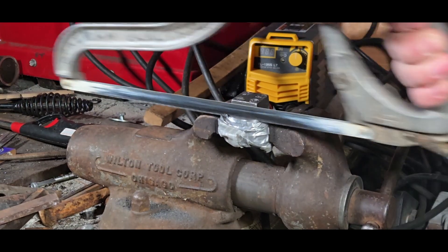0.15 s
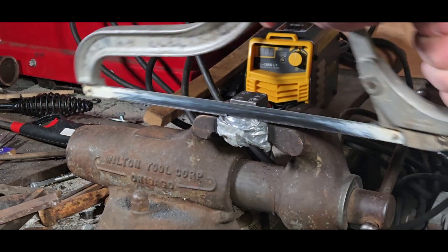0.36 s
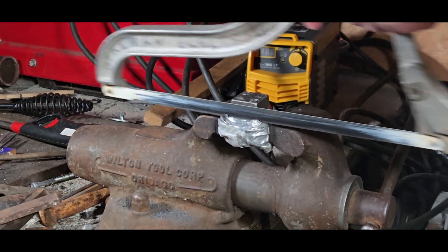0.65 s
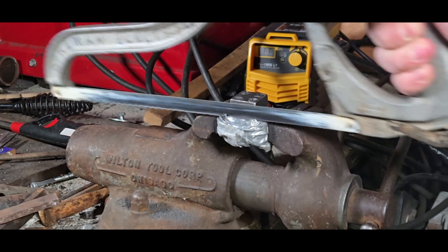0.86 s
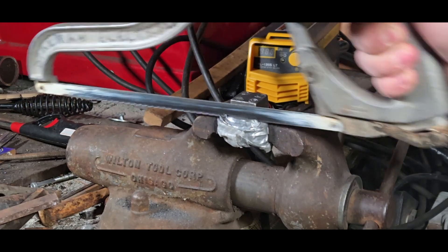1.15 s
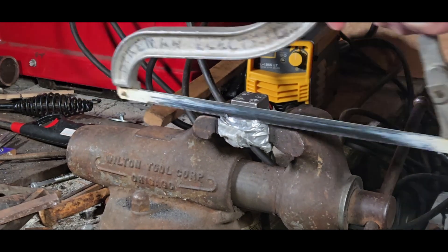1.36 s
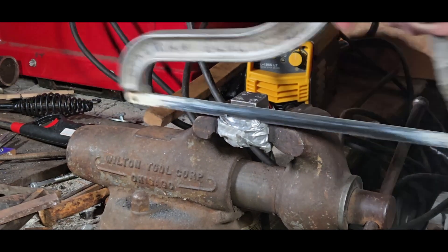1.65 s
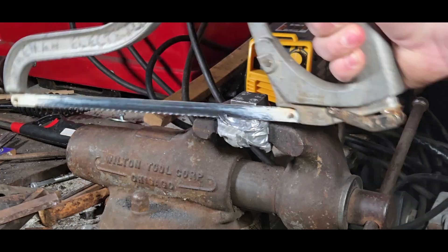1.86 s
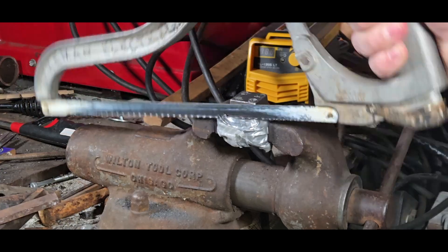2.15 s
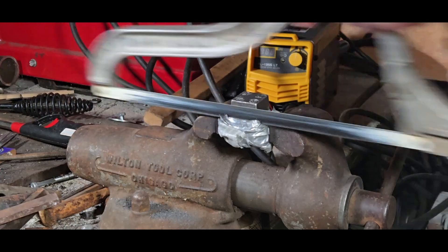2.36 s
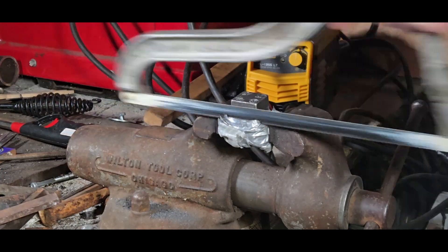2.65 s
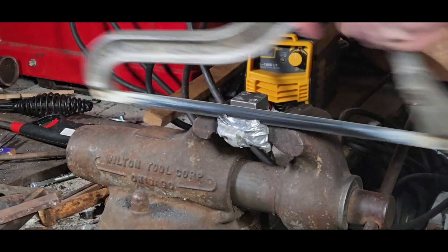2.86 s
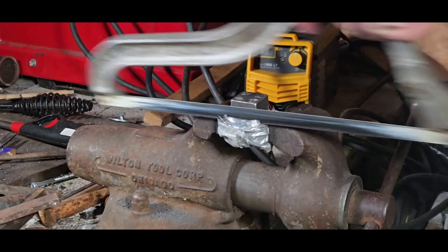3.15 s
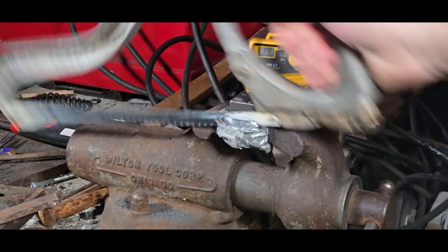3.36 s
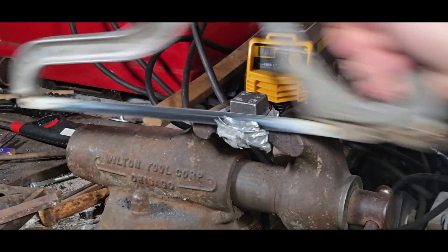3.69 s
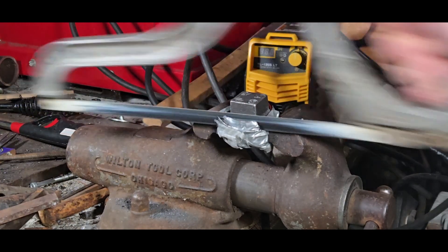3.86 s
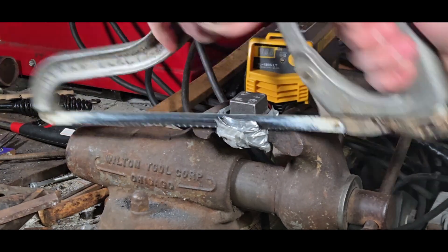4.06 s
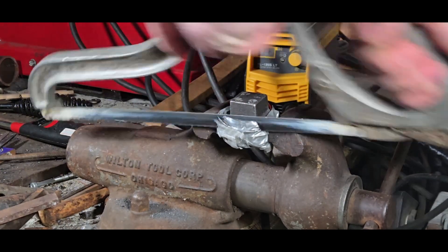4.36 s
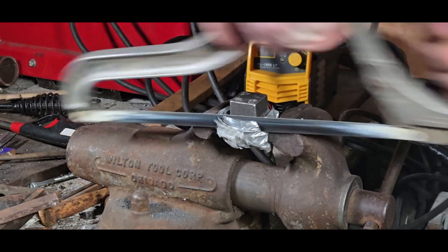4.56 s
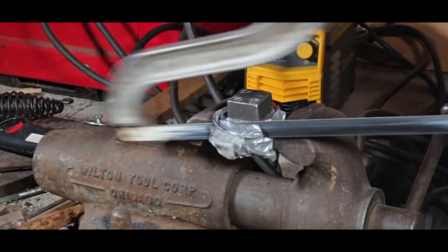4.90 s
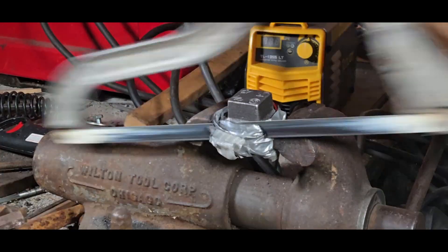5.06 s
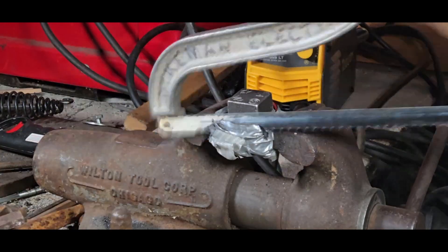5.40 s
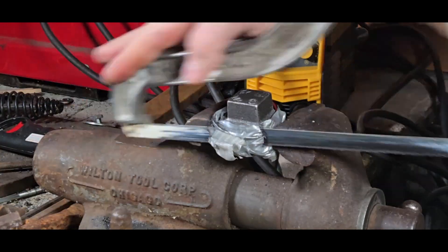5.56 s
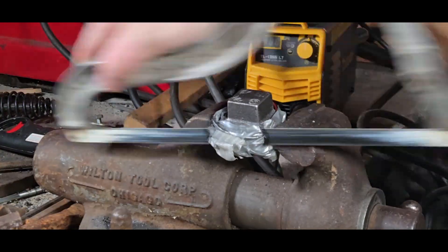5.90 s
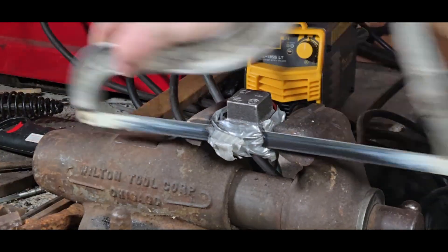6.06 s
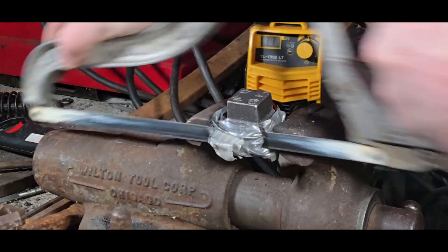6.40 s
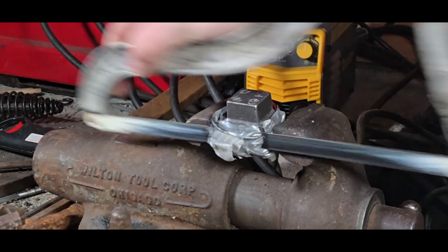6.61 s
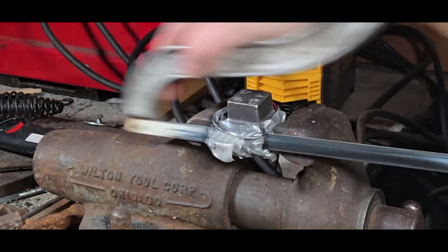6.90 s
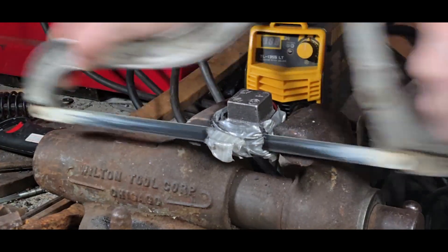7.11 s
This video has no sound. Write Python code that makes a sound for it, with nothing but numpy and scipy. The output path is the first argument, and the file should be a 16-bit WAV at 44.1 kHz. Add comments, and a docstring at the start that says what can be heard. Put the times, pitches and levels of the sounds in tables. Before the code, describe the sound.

Close, dry, fast back-and-forth hacksawing on steel in a vise, soft and pulsing at first, then loud, bright and ringing with occasional snags.

```python
"""A hand hacksaw cuts a steel pipe cap held in a vise, close by, in very quick strokes.
Its teeth are dense random impacts that follow each stroke and ring blade, frame and cap; some modes squeal.
Now and then a tooth snags (a clank) or the frame knocks (a dull thud); the bench rumbles as low noise.
The saw is set down afresh five times, and each seat rings the steel its own way."""
import sys
import numpy as np
from scipy import signal
from scipy.fft import rfft, irfft
from scipy.io import wavfile
from scipy.ndimage import uniform_filter1d

SR = 44100
rng = np.random.default_rng(int(sys.argv[2]) if len(sys.argv) > 2 else 0)


def wav_out(sig):
    """Save sig, one row per channel (or a flat mono array), as 16-bit PCM at SR to the path in sys.argv[1]."""
    wavfile.write(sys.argv[1], SR, np.round(np.clip(np.atleast_2d(sig).T, -1, 1) * 32767).astype(np.int16))


N = 319284
T = np.arange(N) / SR  # the time of each sample in seconds

# The saw's place on the cap at the start and after each setting-down.
# Each row: start in seconds, seat number (counted from 0).
SETTINGS = [(0, 0), (.98, 1), (3.215, 2), (3.95, 3), (4.735, 2), (5.56, 4)]
# How the saw is held, one row for each setting. Each row: treble of the rasp in dB (for a rasp of -39 dB),
# how far the rumble pulses with the stroke (0-1), rumble tilt in dB (added above 200 Hz, taken off below).
HOLD = [(1.5, 0.42, -4), (4.5, 0.88, -5.5), (1.5, 0, 2.5), (1.5, 0.6, 1), (1.5, 0.27, 1), (-4, 0.32, -2.5)]


def gain_of(db):
    """Turns decibels into a factor."""
    return 10 ** (np.asarray(db) / 20)


def evened(x):
    """Scales a sound to an average (RMS) level of 1."""
    return x / np.sqrt(np.mean(x ** 2) + 1e-20)


def add(mix, s, sound):
    """Adds a short sound to the mix from second s on."""
    part = mix[round(s * SR):][:len(sound)]
    part += sound[:len(part)]


def coloured(x, points):
    """Filters by a spectrum of (Hz, dB) points."""
    f, db = np.transpose(points)
    hz = np.fft.rfftfreq(len(x), 1 / SR)
    curve_db = np.interp(np.log(hz + 1), np.log(f + 1), db)
    return irfft(rfft(x) * gain_of(curve_db), len(x))


def ring(x, hz, width):
    """One mode of gain 1 that follows the pitch hz: shift down, smooth, shift back."""
    turn = np.exp(2j * np.pi * np.cumsum(hz * np.ones(len(x))) / SR)
    decay = np.exp(-np.pi * width / SR)  # a wider mode dies sooner
    smooth = signal.lfilter([1 - decay], [1, -decay], x / turn + 1e-18)
    return 2 * (turn * smooth).real


def drift(per_s):
    """A slow random curve: per_s random points a second, joined by straight lines."""
    return np.interp(T * per_s, np.arange(2000), rng.standard_normal(2000))


def setting_at(s):
    """Tells which setting of the saw holds at the times s."""
    return np.searchsorted([start for start, _ in SETTINGS], s, "right") - 1


def by_setting(values):
    """One value for each setting, held until the next, with short slopes between."""
    return uniform_filter1d(np.asarray(values, float)[setting_at(T)], 300)


def at_strokes(rows, s):
    """Lays (s, dB) rows on the nearest strokes; the others get 0 dB."""
    out = np.zeros(len(s))
    for when, db in rows:
        out[np.argmin(abs(s - when))] = db
    return out


def strokes():
    """The hand's motion: blade speed 0-1, rasp gain and rumble level in dB, as the blade goes forth and back."""
    # One row a stroke, forth and back in turn.
    # Each row: turning point in seconds, what full speed adds to the rasp in dB (before the saw's own level).
    stroke_rows = [(0.021, -44.5), (0.236, -49.5), (0.401, -51), (.665, -52), (0.844, -48.5),
                   (0.983, -47.5), (1.036, -43.5), (1.107, -49.5), (1.167, -45.5), (1.239, -47.5),
                   (1.298, -44.5), (1.369, -47.5), (1.436, -43.5), (1.503, -46), (1.57, -42),
                   (1.642, -45.5), (1.709, -42), (1.786, -45), (1.853, -43), (1.934, -46), (2.009, -44),
                   (2.084, -45.5), (2.157, -43.5), (2.226, -48), (2.304, -42), (2.379, -45.5), (2.454, -43),
                   (2.527, -45), (2.597, -43), (2.672, -46), (2.742, -41.5), (2.82, -47), (2.894, -43),
                   (2.98, -45.5), (3.048, -43.5), (3.121, -45.5), (3.189, -45), (3.249, -41),
                   (3.287, -35.5), (3.332, -37.5), (3.373, -35), (3.427, -40), (3.462, -36.5),
                   (3.502, -34.5), (3.546, -36), (3.593, -39), (3.64, -35.5), (3.683, -35.5), (3.723, -36),
                   (3.775, -37.5), (3.806, -38.5), (3.855, -38.5), (3.899, -35.5), (3.961, -39.5),
                   (4.007, -39), (4.059, -37), (4.099, -36.5), (4.153, -37), (4.194, -37), (4.249, -39),
                   (4.298, -37), (4.354, -38.5), (4.403, -35.5), (4.455, -38.5), (4.5, -36.5), (4.554, -36),
                   (4.607, -35.5), (4.664, -38.5), (4.724, -37), (4.746, -35.5), (4.799, -39), (4.853, -38),
                   (4.902, -38), (4.947, -35.5), (4.998, -41.5), (5.054, -38), (5.106, -38.5),
                   (5.149, -37.5), (5.199, -40.5), (5.252, -37.5), (5.305, -42.5), (5.359, -33.5),
                   (5.418, -39.5), (5.52, -36.5), (5.563, -40.5), (5.664, -36), (5.732, -35.5),
                   (5.783, -37), (5.837, -36.5), (5.891, -34.5), (5.945, -33.5), (6.001, -34), (6.053, -36),
                   (6.108, -35), (6.165, -35), (6.211, -35.5), (6.269, -35), (6.327, -35.5), (6.379, -37.5),
                   (6.429, -33), (6.486, -35), (6.543, -35), (6.598, -33), (6.654, -33.5), (6.716, -34),
                   (6.771, -35), (6.83, -34.5), (6.883, -35), (6.94, -36), (6.997, -34.5), (7.055, -34.5),
                   (7.107, -33.6), (7.164, -34.5), (7.214, -34.5), (7.253, -38)]
    # The rasp left at the turn. Each row is one setting: forth in dB, back in dB.
    turn_rule = [(-64.5, -68), (-64, -68.5), (-45, -44.5), (-53, -60), (-45, -45.5), (-56.5, -50)]
    # Where in the stroke the blade is fastest. Each row is one setting: forth (0-1), back (0-1).
    fastest_rule = [(0.48, 0.51), (0.38, .46), (0.43, 0.54), (0.31, 0.41), (0.47, 0.49), (.37, 0.3)]
    # The usual bench rumble. Each row is one setting: forth in dB, back in dB.
    rumble_rule = [(-53, -47.5), (-46, -47), (-59.5, -48.5), (-51.5, -53.5), (-51, -56), (-59.5, -53)]
    # Turns that rasp louder or softer. Each row: turning point in seconds, dB over the usual turn.
    odd_turns = [(.399, 4.5), (.665, -3), (1.3, 1), (2.224, -11), (3.503, -6), (3.963, -5), (4.72, -3.5),
                 (4.855, 4.5), (5.056, 9), (5.252, -4.5), (5.419, 3), (5.52, 0.5), (5.565, -3),
                 (5.662, -19), (6.11, 4), (6.329, 8.5), (6.43, -5), (6.653, -8), (6.884, -10), (7.106, -7)]
    # Strokes that shake the bench more or less. Each row: turning point in seconds, dB over the usual rumble.
    odd_rumbles = [(.399, -2.5), (.665, -9.5), (1.241, -3), (1.3, 2), (1.852, 3.5), (2.224, -7.5),
                   (2.303, 1.5), (2.742, -1), (2.979, 6.5), (3.119, 1.5), (3.249, -9.5), (3.425, 6),
                   (3.963, -6), (4.904, -18), (5.305, 6), (5.419, 4), (6.329, 5.5)]
    rumble_scatter_db = 2.5  # from stroke to stroke

    s, full_db = np.transpose(stroke_rows)
    setting, way = setting_at(s), np.arange(len(s)) % 2  # way: 0 forth, 1 back
    turn_db = np.array(turn_rule)[setting, way] + at_strokes(odd_turns, s)
    place = np.array(fastest_rule)[setting, way]
    rumble_db = np.array(rumble_rule)[setting, way] + at_strokes(odd_rumbles, s)
    rumble_db = rumble_db + rumble_scatter_db * rng.standard_normal(len(s))

    k = np.clip(np.searchsorted(s, T, "right") - 1, 0, len(s) - 2)  # the stroke at each moment
    phase = np.clip((T - s[k]) / (s[k + 1] - s[k]), 0, 1)
    bend = np.log(.5) / np.log(place[k])  # moves the top speed to its place
    speed = abs(np.sin(np.pi * phase ** bend))
    bite = np.tanh(1.5 * speed ** 3)  # the teeth grip late, then level off
    rasp = gain_of(np.interp(T, s, turn_db)) + gain_of(full_db[k]) * bite
    middles = (s[1:] + s[:-1]) / 2
    return speed, uniform_filter1d(rasp, 240), np.interp(T, middles, rumble_db[:-1])


def teeth(per_s, spread_db):
    """Dense tooth impacts at random moments, a few of them large."""
    size = gain_of(spread_db * np.minimum(rng.exponential(1, N), 3.5))
    struck = rng.random(N) < per_s / SR
    return evened(size * struck * rng.standard_normal(N))


def squeal_db(hz):
    """The extra ring, in dB, when the steel mode near hz sings out for a moment."""
    # Each row: start in seconds, length in seconds, pitch of the mode in Hz, dB over its usual ring.
    squeals = [(.1, 0.036, 6414, 11), (0.334, 0.09, 6414, 11), (.47, 0.11, 5906, 4), (.04, .07, 4570, 5),
               (4.85, 0.019, 2213, 10), (5.433, 0.047, 2213, 17), (5.432, .015, 2937, 6),
               (5.531, 0.042, 1420, 15), (5.89, 0.014, 3782, 2), (6.106, 0.014, 3782, 7),
               (6.211, 0.011, 3782, 5), (6.773, 0.013, 3782, 10)]
    extra = np.zeros(N)
    for s, length, f, db in squeals:
        if abs(f / hz - 1) < .08:
            extra += db * ((T > s) & (T < s + length))
    return uniform_filter1d(extra, size=200)


def saw(rasp):
    """Tooth impacts ring the steel; each mode swells, fades and shifts as the free length of blade changes."""
    # Modes of blade, frame and cap. Each row: middle pitch in Hz, width in Hz,
    # then the usual ring in dB over the grit in seats 0, 1, 2, 3 and 4.
    steel = [(1410, 195, 14.5, 15, 10, -9, 1), (1983, 44, -14, 6, 9, -24, 16.5),
             (2150, 300, 14, 11.5, 5, 4, 0.43), (2923, 250, 7.5, 4.5, 2, 6, 7.3),
             (3767, 101, 13.5, 10, 9, 5, 15.3), (4547, 120, 2, 2, 6, 4, 7.3),
             (5068, 73, -6, 4, 7.5, 9, 1.2), (5845, 170, -4, -0.5, 9.5, 6.5, 11),
             (6365, 154, 13, 9.5, 13.5, 12.5, 12.5), (7630, 265, 6, 0, -2, 2, 9.8),
             (8396, 160, 11, 6.5, -3, 15, 8.4), (11130, 240, 11, 5.5, 2.5, -3, 1),
             (12700, 79, -6, 6, 4.5, -5, 2), (13800, 160, -5, 1, 5, 0, 2)]
    # Colour of the bare tooth impacts. Each row: frequency in Hz, level in dB.
    grit_colour = [(300, -15.5), (800, -13.5), (1800, -10.5), (4500, 2), (7000, -4.5), (10000, -9),
                   (16000, -22.5)]

    impacts = evened(coloured(teeth(15000, spread_db=1.24), grit_colour))
    grit = rasp * gain_of(1.33 * drift(150)) * impacts
    treble = signal.sosfiltfilt(signal.butter(2, 7500, "high", fs=SR, output="sos"), grit)
    # a harder bite is brighter
    harshness = (rasp / gain_of(-39.0)) ** 0.67 * gain_of(by_setting([row[0] for row in HOLD]))
    grit = grit + treble * (harshness - 1)

    out, seat = grit, [number for _, number in SETTINGS]
    for hz, width, *seat_db in steel:
        swell_db = by_setting(np.take(seat_db, seat)) + 4.32 * drift(35) + squeal_db(hz)
        pitch = hz * (1 + .007 * drift(30))
        out = out + ring(grit * gain_of(swell_db), pitch, width)
    return gain_of(-9.5) * out


def snags():
    """A tooth catches: a burst of blows that swells and dies, on quickly damped modes."""
    # Each row: start in seconds, peak in dB, rattle time in seconds (from the start to the height of the burst).
    catches = [(3.226, -27, .002), (3.832, -25, .003), (4.837, -24, .003), (5.039, -17.5, .003),
               (5.456, -24, .003), (5.8755, -18.5, .0006), (6.0955, -26, .0006), (6.2025, -23, .0006),
               (6.3035, -19.5, .0007), (6.5275, -23, .0006)]
    # Modes that a catch rings. Each row: pitch in Hz, level in dB (against each other).
    clank_modes = [(1900, 10), (2250, 14.5), (4750, 16), (5500, 15), (6900, -37)]
    out, t = np.zeros(N), np.arange(2000) / SR
    for s, db, rattle in catches:
        blows = rng.standard_normal(len(t)) * t / rattle * np.exp(-t / rattle)
        clank = np.zeros(len(t))
        for hz, mode_db in clank_modes:
            clank += gain_of(mode_db) * evened(ring(ring(blows, hz, 520), hz, 520))
        add(out, s, gain_of(db) * clank / abs(clank).max())
    return out


def knocks():
    """The frame knocks and shakes the vise: a wide low resonance and a short clack above it."""
    # Each row: start in seconds, peak of the thud in dB, pitch in Hz.
    blows = [(0.127, -34.5, 94), (0.169, -36.5, 90.5), (.31, -45.5, 95), (.46, -44.5, 400),
             (0.499, -40.5, 381), (.945, -39.5, 200), (1.074, -36.5, 378), (1.195, -31.5, 263),
             (2.924, -36, 453), (3.405, -24.5, 284), (3.859, -41, 264), (4.751, -28.5, 324),
             (4.887, -32, 467), (4.984, -32.5, 193), (5.088, -32, 272), (5.397, -25.5, 306)]
    out, t = np.zeros(N), np.arange(9000) / SR
    for s, db, hz in blows:
        swell = np.minimum(t * hz / 2.4, 1)  # full after 2.4 cycles
        fade = gain_of(-60 * t / (0.078 + 12 / hz))  # low knocks last longer
        shake = rng.standard_normal(len(t)) * swell * fade
        shake[0] = 14 * gain_of(db + 21.5)  # harder knocks start with a stronger crack
        thud = ring(ring(shake, hz, 4.3 * hz), hz, 0.83 * hz)
        clack = ring(ring(shake * np.exp(-t / 0.014), 5.1 * hz, 1300), 2.0 * hz, 2000)
        add(out, s, gain_of(db) * (thud + 0.066 * clack) / abs(thud).max())
    return out


def bench(speed, rumble_db):
    """Lumpy low noise that comes through vise and bench and pulses with the strokes."""
    # Colour of the rumble before its tilt. Each row: frequency in Hz, level in dB.
    rumble_colour = [(15, -40), (28, -14), (85, -1), (226, -2.5), (480, -3), (900, -9.5), (2200, -21),
                     (5000, -65)]
    _, pulsing, tilt_db = (by_setting(column) for column in np.transpose(HOLD))
    noise = evened(coloured(rng.standard_normal(N), rumble_colour))
    low = signal.sosfiltfilt(signal.butter(1, 200, fs=SR, output="sos"), noise)
    noise = gain_of(-tilt_db) * low + gain_of(tilt_db) * (noise - low)
    late = np.roll(speed, 250)  # the heavy bench lags the blade by 250 samples
    return noise * gain_of(rumble_db - 16.7 * pulsing * (1 - late) + 2.16 * drift(60))


def scene():
    """Adds up the saw, its snags and knocks, and the bench, all driven by one hand."""
    speed, rasp, rumble_db = strokes()
    return (saw(rasp) + snags() + bench(speed, rumble_db) + knocks())[None]


def record(dry):
    """The band limit: a steep filter takes away the highest treble."""
    edge_hz = 15780
    lowpass = signal.firwin(1023, edge_hz, window=("kaiser", 9), fs=SR)
    return signal.oaconvolve(dry, lowpass[None], "same")


dry = scene()
out = record(dry)
wav_out(out)
```